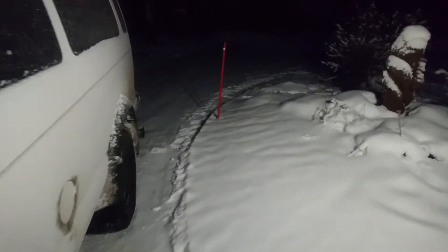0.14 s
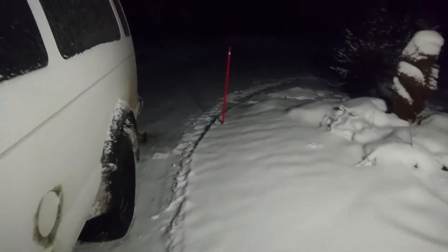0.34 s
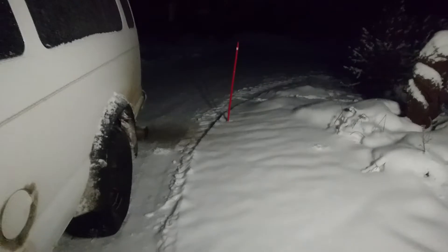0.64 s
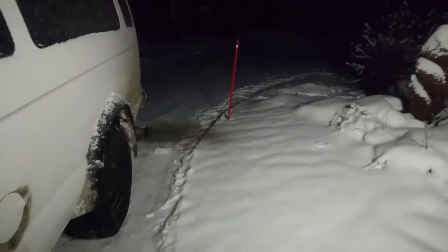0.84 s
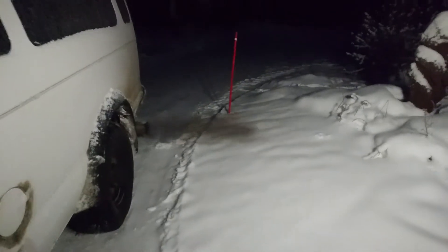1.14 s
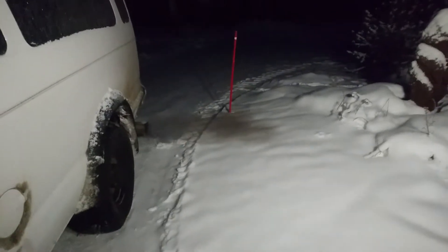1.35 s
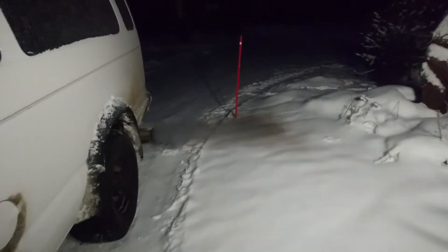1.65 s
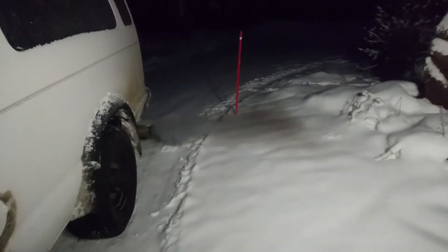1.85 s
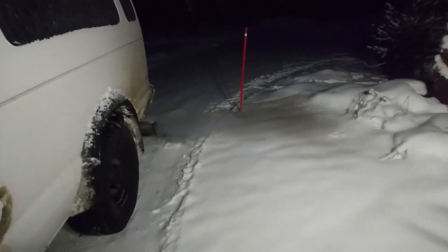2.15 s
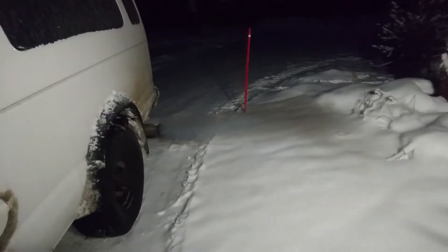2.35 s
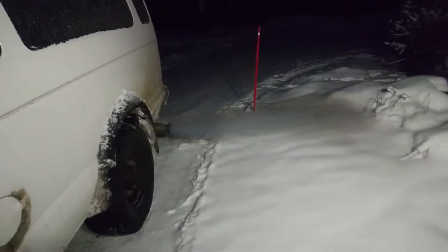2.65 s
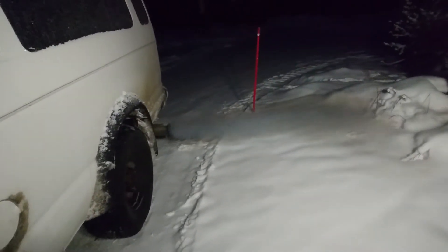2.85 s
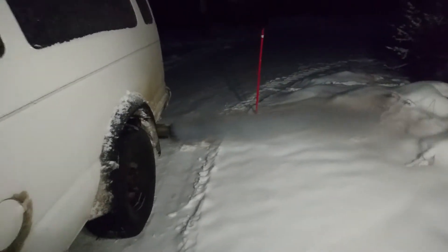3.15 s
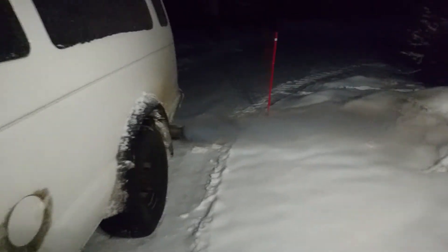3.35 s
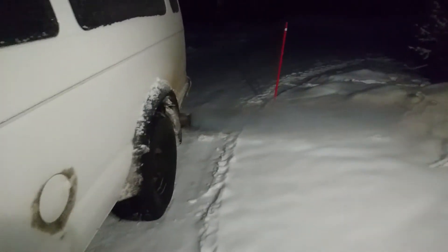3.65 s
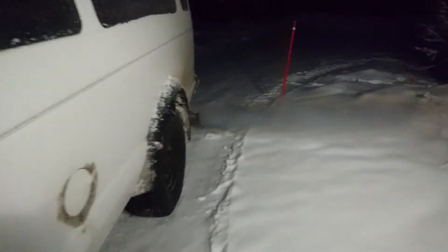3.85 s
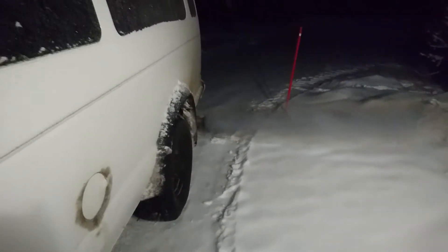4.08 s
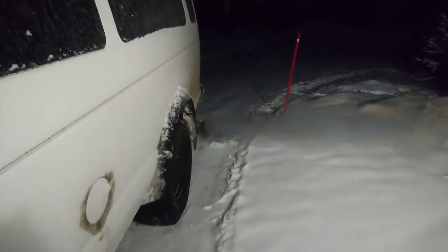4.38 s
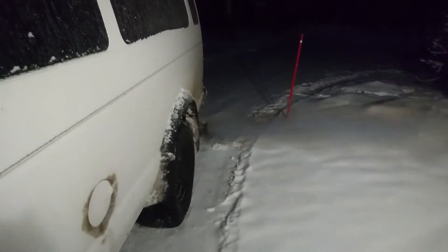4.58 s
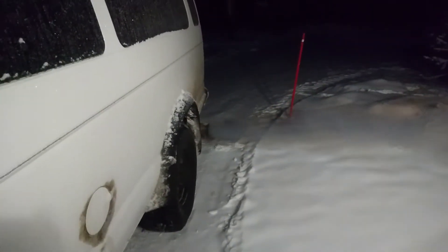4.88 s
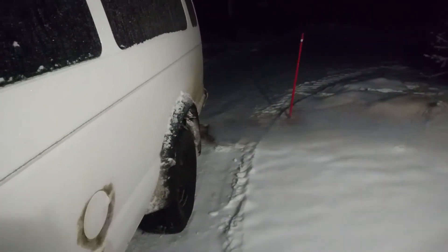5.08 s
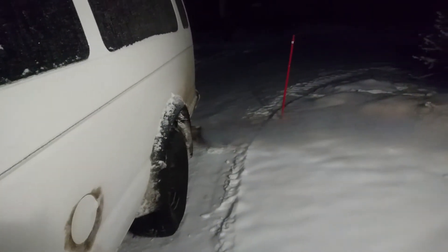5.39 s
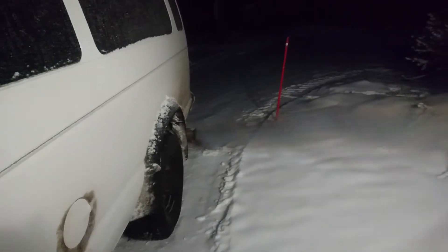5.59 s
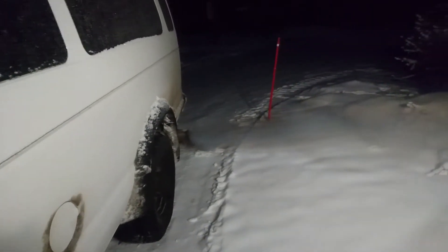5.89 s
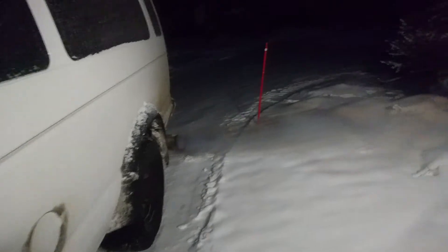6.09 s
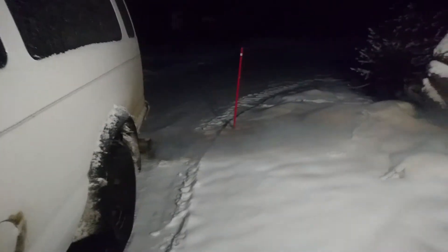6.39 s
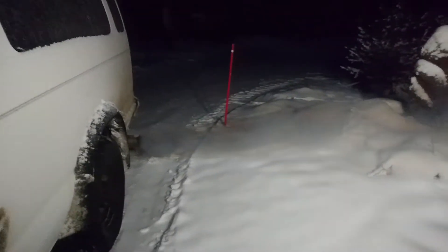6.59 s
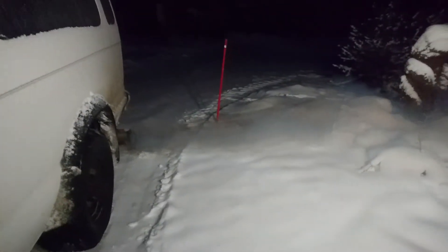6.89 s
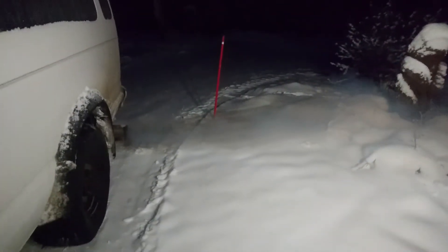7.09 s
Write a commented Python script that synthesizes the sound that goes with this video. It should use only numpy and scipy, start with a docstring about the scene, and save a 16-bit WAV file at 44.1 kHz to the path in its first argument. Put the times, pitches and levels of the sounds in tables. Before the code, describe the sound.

From 0 s a big cold eight-cylinder diesel, already caught, races with a strong burst of deep exhaust, firing about 93 times a second. Gas rushes and barks, intake roar builds briefly, and a wavering belt whine stands out between about 0.2 and 1.8 s. A single dry handling click falls near 0.66 s. The pitch slides down quickly until about 1.2 s, then more slowly; roar and whine sink away by 2.5 s, uncovering knocks and clatter. From 2.5 to 4.3 s the lumpy exhaust weakens in places, with bright metallic ticks and hard knocks at irregular moments. From about 4.7 s it holds a rough idle near 50 firings a second, throbbing, rattling and tapping under a thin flickering hiss, and continues to the end at 7.2 s. Outdoors on snow, close and dry; a stereo phone a few metres away, deepest bass thinned, taps drifting right as it turns.

```python
"""The exhaust of a cold eight-cylinder diesel van leads: just caught, it races, drops to idle and fires unevenly.
Each firing sends a pressure pulse that rings the pipe; gas noise rushes and barks after it. Knocks are noise
bursts that also ring the block; the valve gear ticks and taps. Intake roar and a belt-driven whine sink with
the speed, over a thin flickering hiss; one dry handling click stands apart from the engine.
A phone with two microphone ports hears it from a few metres off, on snow."""
import sys
import numpy as np
from scipy import signal
from scipy.fft import rfft, irfft, next_fast_len
from scipy.io import wavfile
from scipy.ndimage import uniform_filter1d, map_coordinates

SR = 44100
rng = np.random.default_rng(int(sys.argv[2]) if len(sys.argv) > 2 else 0)


def waveform_to_disk(signal):
    """Save audio, clipped to [-1, 1], as 16-bit WAV at the path in sys.argv[1]."""
    frames = np.transpose(np.atleast_2d(signal))
    scaled = np.clip(frames, -1, 1) * 32767
    samples = np.round(scaled).astype(np.int16)
    wavfile.write(sys.argv[1], SR, samples)


N = 318843
M = next_fast_len(N)  # transform length [samples]

# how fast the engine fires: (time [s], firing rate [Hz])
FIRING_RATE = [(0, 93.07), (0.25, 87.9), (0.5, 80.03), (0.75, 75.27), (1, 68.19), (1.25, 62.01),
               (1.5, 61.12), (2, 56.91), (2.3, 55.81), (2.55, 52.73), (3, 54.7), (3.3, 52.89), (4.3, 52.68),
               (4.7, 48.27), (5.1, 50.28), (6.4, 49.52), (6.8, 48.41), (7.23, 50.44)]
START = .62  # firings elapsed at the start
KNOCK_AT = 0.677  # place of the knock between two firings, 0-1
IDLE_HZ = 50  # firing rate at idle [Hz]
SIDES = np.array([[.5], [-.5]])  # shares a left-minus-right difference between the ports


def undb(db):
    """Amplitude factor of a level in dB."""
    return 10 ** (np.asarray(db) / 20)


def unit(x):
    """Scale to an RMS of 1 over all channels together."""
    return x / np.sqrt(np.mean(x ** 2))


def curves(table, s=None):
    """Columns of a time table at times s, by default every sample."""
    t, *columns = np.transpose(table)
    s = np.arange(N) / SR if s is None else s
    return np.array([np.interp(s, t, column) for column in columns])


def gain(points):
    """Gain of (frequency [Hz], level [dB]) points at every frequency bin."""
    hz, db = np.transpose(points)
    bins_hz = np.fft.rfftfreq(M, 1 / SR)
    return undb(np.interp(np.log(bins_hz + 1), np.log(hz), db))


def colour(x, points):
    """Shape the spectrum of x without delay."""
    return irfft(rfft(x, M) * gain(points), M)[..., :N]


def band(x, hz, width_hz):
    """One resonance of the given width."""
    return signal.lfilter(*signal.iirpeak(hz, hz / width_hz, SR), x)


def ring(x, modes):
    """Decaying modes (frequency [Hz], level [dB], 60 dB decay time [s]) struck by x."""
    out = 0
    for hz, db, t60 in modes:
        pole = np.exp(2j * np.pi * hz / SR - np.log(1000) / (t60 * SR))
        out = out + undb(db) * signal.lfilter([1], [1, -pole], x).imag
    return out


def pulses(s, size):
    """Impulses at times s, each shared between two samples."""
    at, out = np.clip(s * SR, 0, N - 2), np.zeros(N)
    i = at.astype(int)
    np.add.at(out, i, size * (1 - at + i))
    np.add.at(out, i + 1, size * (at - i))
    return out


def walk(rate):
    """Random levels held for 1 / rate seconds and slewed twice; spread near 1."""
    k = int(SR / rate)
    held = np.repeat(rng.standard_normal(N // k + 1), k)
    return 1.3 * uniform_filter1d(uniform_filter1d(held, k), k)[:N]


def swell(x, rise_s, fall_s):
    """Each impulse becomes a quick rise and a fall, at an RMS of 1."""
    for s in (rise_s, fall_s):
        x = signal.lfilter([1], [1, -np.exp(-1 / (s * SR))], x)
    return unit(x)


def bump(t, middle_s, half_s):
    """A bell curve in time, 1 at its middle."""
    return np.exp(-((t - middle_s) / half_s) ** 2)


def air():
    """White noise at the two ports: a common part and a scattered part of each port's own."""
    # own paths off the snow and the panels, against the common part: (frequency [Hz], level [dB])
    scatter = [(200, -22.5), (500, -7.5), (1000, -4), (2000, -5.5), (3300, 6), (4200, -3.5), (5500, -0.5),
               (8000, 1.5), (12000, 12)]
    common, left, right = rfft(rng.standard_normal((3, M)))
    own = gain(scatter)
    both = (common + own * np.array([left, right])) / np.sqrt(1 + own ** 2)
    return irfft(both, M)[:, :N]


def thin_hiss():
    """High coloured noise that flickers and follows its own level curve."""
    # spectrum of the hiss: (frequency [Hz], relative level [dB])
    hiss_colour = [(5500, -5), (7000, 12), (8200, -1), (9600, -6), (11100, 1.5), (12500, -5.5),
                   (13500, -33), (15500, -19)]
    # its course: (time [s], level [dB])
    hiss_level = [(0, -78), (.4, -48), (.75, -45.5), (1.7, -59), (2.4, -63), (3.4, -52.5), (4.3, -63),
                  (5.6, -58.5), (6.5, -54.5), (7.23, -55)]
    flicker = undb(1.44 * walk(23.19))
    return unit(colour(air(), hiss_colour)) * flicker * undb(curves(hiss_level)[0])


def handling_click():
    """One dry broadband handling click: a differenced, very short decay at a set time."""
    # the click: (time [s], level [dB])
    dry_click = [(0.6578, -16)]
    s, db = np.transpose(dry_click)
    return np.diff(signal.lfilter([1], [1, -.4], pulses(s, undb(db))), prepend=0)


def belt_whine(firings):
    """Two sines locked to the firing rate, wavering in level and phase."""
    # level of the two tones: (time [s], lower tone level [dB], upper tone level [dB])
    whine_level = [(0, -58, -54), (.17, -44, -54), (.27, -30.5, -34.5), (.45, -37, -50), (.6, -27, -33.5),
                   (.85, -31.5, -42), (.97, -43, -54), (1.2, -50, -41), (1.35, -36.5, -40),
                   (1.75, -37, -48), (2, -45, -45), (2.6, -72, -62)]
    # pitch of each tone: one entry per tone [cycles per firing]
    orders = [7, 10.5]
    out = 0
    for order, db in zip(orders, curves(whine_level)):
        phase = 2 * np.pi * order * firings + .7 * walk(40)
        out = out + undb(db + 3.5 * walk(20)) * np.sin(phase)
    return out


def valve_gear(when):
    """Metallic ticks and duller taps ring at fixed places of every round, with loud ticks at set times."""
    # one round of eight firings: (place [firings], tick [dB], upper tick [dB], low tap [dB], high tap [dB])
    gear = [(1.65, -50, -60, -45, -31), (2.7, -60, -60, -36, -31), (3.65, -41, -56, -45, -36),
            (4.68, -60, -60, -24, -36), (6.6, -41, -50, -38, -23)]
    # spread from round to round: one entry for each of the four sounds [dB]
    gear_scatter = [2, 3, 1.5, 1.5]
    # the loudest ticks: (time [s], level [dB], upper mode level against it [dB])
    loud_ticks = [(1.6734, -37, -16), (1.997, -31, -17), (2.0858, -33.0, -20), (2.2278, -38, -16.0),
                  (2.5254, -32.0, -17.0), (2.5768, -37, -18), (2.6736, -30.0, -14.0), (2.8241, -30, -4),
                  (2.9675, -32, -10), (3.116, -25.5, -17.0), (3.1691, -31, -17), (3.27, -24.5, -18.0),
                  (3.4698, -31, -1), (3.5646, -30, -5), (3.6251, -31, -2), (3.7186, -30, -11.0),
                  (3.7725, -27.0, -3), (3.8664, -31, -16.0), (3.9262, -32, -10), (4.1756, -29.0, -16.0),
                  (4.3291, -45, -14.0), (4.3808, -40, -12.0), (4.539, -31.0, -4), (4.6463, -32.0, -14.0),
                  (5.1845, -31, -1), (5.4466, -38, -15.0), (5.6651, -35, -1), (5.7695, -41, -12.0),
                  (5.9265, -32, -18.0), (5.985, -32, -17.0), (6.0876, -41, -14.0), (6.2517, -33, -16.0),
                  (6.3097, -31, -17.0), (6.4111, -34.0, -15), (6.8003, -38, -20), (7.0648, -37, -13.0)]
    # ringing of the ticks, lower and upper: (frequency [Hz], level [dB], 60 dB decay time [s])
    low_modes = [(5030, 1, .03), (4880, -2, .02), (5220, -5, .015)]
    high_modes = [(6770, 0, .015), (7250, -5, .012)]
    # low tap, then high tap: lists of (frequency [Hz], level [dB], 60 dB decay time [s])
    tap_modes = [
        [(1995, -3, 0.033), (2080, -2, 0.032)],
        [(2340, -4, 0.034), (2660, -12.5, 0.026)],
    ]
    # the taps drift right as the phone turns: (time [s], left minus right [dB])
    tap_pan = [(2.5, 0), (4.5, -2.5), (6.2, -6)]
    jitter_s = .0005
    fade_db_per_hz, fade_above_hz = -1.2, 56  # ticks and taps fade at faster firing
    tick_left_db = 4  # the ticks sit this much further left than the taps

    place, *levels = np.transpose(gear)
    at = (8 * np.arange(len(when) // 8)[:, None] + place).ravel()
    chance = rng.standard_normal((len(at), 5)).T
    s = np.interp(at, np.arange(len(when)), when) + jitter_s * chance[0]
    fade_db = fade_db_per_hz * np.maximum(curves(FIRING_RATE, s)[0] - fade_above_hz, 0)
    low, high, *taps = (pulses(s, undb(np.resize(db, len(s)) + fade_db + spread_db * own))
                        for db, spread_db, own in zip(levels, gear_scatter, chance[1:]))

    loud_s, loud_db, upper_db = np.transpose(loud_ticks)
    low = low + pulses(loud_s, undb(loud_db))
    high = high + pulses(loud_s, undb(loud_db + upper_db))
    pings = ring(low, low_modes) + ring(high, high_modes)
    pings = sum(band(pings, hz, 1300) for hz in (5000, 6950))
    taps = sum(band(ring(x, modes), modes[0][0], 800) for x, modes in zip(taps, tap_modes))
    pan = curves(tap_pan)
    return pings * undb((pan + tick_left_db) * SIDES) + taps * undb(pan * SIDES)


def gas_noise(when):
    """Turbulent noise of the gas, steady underneath and barking after each firing."""
    # bark after each of cylinders 1-8: one entry per cylinder [dB]
    bark = [-8, -6, -10, 6, -2, -10, 5, 0]
    n = np.arange(len(when))
    barks = pulses(np.interp(n + KNOCK_AT, n, when), undb(np.array(bark)[n % 8]))
    gate = 1.3 + swell(barks, 0.007, 0.007)
    return gate * undb(.7 * walk(9)) * air()


def intake_roar(gas, flow):
    """The gated gas noise in the intake's colour, sinking as the flow falls."""
    # spectrum of the roar: (frequency [Hz], relative level [dB])
    roar_colour = [(180, -38), (290, 11), (450, -61), (720, -25), (850, -10), (1000, -25), (1150, -37),
                   (1420, 4), (1650, 5.5), (1950, -9), (2400, -1.5), (2670, -5), (2900, -25), (3100, -2),
                   (3400, -11), (4200, -15), (5200, -25), (5800, -15), (7000, -50)]
    return unit(colour(gas, roar_colour)) * undb(-47 + 0.79 * flow)  # idle dB, dB per Hz of flow


def gas_rush(gas, flow):
    """Gas noise that grows with flow, plus two bands that swell and sink on their own."""
    # spectrum of the rush: (frequency [Hz], relative level [dB])
    rush_colour = [(60, -54), (140, 4), (165, -4.5), (190, -8), (220, 2), (245, -12.5), (290, -14.5),
                   (310, -18.5), (340, -11), (410, -5.5), (530, -10.5), (620, -6.5), (800, -17.5),
                   (1100, -14), (1550, -25.5), (1900, -16.5), (4000, -88)]
    # the two bands: (frequency [Hz], relative level [dB])
    low_band = [(190, -1), (240, 24), (290, 8), (340, 6), (420, -43.5)]
    middle_band = [(330, -9), (430, -4.5), (600, 0.5), (760, 11), (900, 6.5), (1100, -35)]
    # their course: (time [s], low band level [dB], middle band level [dB])
    bands_level = [(0, -34, -46), (.8, -48, -52), (1.3, -37, -54), (1.9, -43, -69), (2.8, -52, -63),
                   (3.8, -74, -52), (4.7, -58, -50), (5.8, -73, -38.5), (6.5, -45.5, -48), (7.23, -57, -51)]
    rush = unit(colour(gas, rush_colour)) * undb(-34 + 0.245 * flow)  # idle dB, dB per Hz of flow
    for points, db in zip((low_band, middle_band), curves(bands_level)):
        rush = rush + unit(colour(gas, points)) * undb(db)
    return rush


def knock_times(when):
    """Combustion strikes the block a little unevenly between firings."""
    n = np.arange(len(when))
    return np.interp(n + KNOCK_AT, n, when) + .0008 * rng.standard_normal(len(n))


def block_ring(strikes):
    """Each blow, a short push and a noisy grit, sets the modes of the block ringing."""
    # modes of the block: (frequency [Hz], 60 dB decay time [s], blow from cylinders 1-8 [8 x dB])
    modes = [(1069.5, 0.051, -20, -24, 8, 1, 9, -19, -12, 0),
             (1202.5, 0.077, -1.5, -17, 8.5, 0.5, 1, 1, 7.5, -0.5),
             (1292, 0.049, -30, -16, 5, -18, -2.5, 3, 9, 6), (1630, 0.015, 3, -3, -16, 13, 3, -14, 12, 4),
             (1733, 0.022, 11, 1, -14, 15.5, 4, 7, -2, -4),
             (2186, 0.066, -17, -26, -12, -2, -16, -3, 4, -17),
             (2710, 0.013, -24, -14, -1, 11, -8, -8, -13, -24)]
    # course of the ring: (time [s], level [dB])
    ring_level = [(0, -70), (.8, -40), (1.5, -36.5), (2.2, -36.5), (3, -33), (3.8, -36), (5, -36),
                  (6, -34.5), (7.23, -36.5)]
    contact_s = 0.0001
    n = np.arange(len(strikes))
    scatter_db = rng.standard_normal(len(n))
    grit = undb(5) * air()  # 5 dB over the push, before its own envelope
    block = 0
    for hz, t60, *db in modes:
        blows = pulses(strikes, undb(np.array(db)[n % 8] + scatter_db))
        size = np.sqrt(np.mean(blows ** 2))
        push = swell(blows, contact_s, contact_s) + swell(blows, 0.004, 0.0055) * grit
        block = block + size * band(ring(push, [(hz, 0, t60)]), hz, 270)
    return unit(block) * undb(curves(ring_level)[0])


def clatter(strikes, flow):
    """Knocks shake covers, pipes and brackets: noise bursts in several bands over a steady rattle."""
    # spectrum of the clatter: (frequency [Hz], relative level [dB])
    clatter_colour = [(400, -47), (700, -27), (950, -9), (1200, -4), (1500, -8.5), (1980, -6),
                      (2350, -10.5), (2750, -9), (3450, -14), (4200, -15), (5000, -18.5), (5600, -20.5),
                      (7000, -26.5), (7700, -31), (8400, -37.5), (10300, -42.5), (13500, -45), (16000, -96)]
    # how hard each cylinder shakes each group of parts: (frequency [Hz], cylinders 1-8 [8 x dB])
    parts = [(700, -12, 1, 2.7, 11, 14, 3, 7.4, 1), (1180, -9, 1.4, 10.7, 1.3, -36, 13, 10, 3),
             (1580, 14.5, 6.7, 2.3, 10, 0, 16, 9.8, 2), (2020, -13, 1, 4.5, 12, 11.5, 9, 9, 10.5),
             (2660, -2, 13, 6.7, 4.3, 13.5, 3, 13.7, 7), (3370, 16.5, 14, 14.6, 8.6, 8, 8.5, 3.7, -5),
             (5160, -2, 2.8, 1.5, 7.7, -3, 5.5, 9.7, -8.5),
             (7050, 13.5, 10, 0.89, 7.3, 11, 12.5, 14.5, -15)]
    # the hardest knocks, at set times: (time [s], relative level [dB])
    hard_knocks = [(2.1394, -24.5), (2.5784, -19.5), (2.6552, -18), (3.0184, -23), (3.171, -15.5),
                   (3.3242, -18), (3.4714, -20.5), (3.5487, -25.5), (3.6205, -17.5), (3.6983, -28.5),
                   (3.7732, -21), (4.1753, -28), (4.3084, -23), (4.5394, -34.5), (5.0273, -22),
                   (5.0882, -27), (5.186, -22), (5.2688, -20), (5.588, -21), (5.8255, -35.5), (5.91, -23),
                   (5.9851, -33.5), (6.2331, -23.5), (6.272, -23), (6.3099, -38), (6.4311, -33),
                   (6.7205, -21), (6.7614, -32), (6.9245, -19), (7.2069, -25.5)]
    n = np.arange(len(strikes))
    hz, *knock_db = np.transpose(parts)
    shared_chance, *part_chances = rng.standard_normal((len(n), 1 + len(hz))).T
    rattle = 1.4 * undb(0.5 * walk(19))
    noise = colour(air(), clatter_colour)
    spectrum, octaves = rfft(noise, M), np.log2(np.fft.rfftfreq(M, 1 / SR) + 1)
    out = 0
    for k, own in enumerate(part_chances):
        share = np.interp(octaves, np.log2(hz), np.eye(len(hz))[k])  # neighbours cross-fade
        db = np.array(knock_db)[n % 8, k] + shared_chance + 1.3 * own
        bursts = swell(pulses(strikes, undb(db)), .003, .006)
        out = out + irfft(spectrum * share, M)[:, :N] * (rattle + bursts)
    hard_s, hard_db = np.transpose(hard_knocks)
    hard = swell(pulses(hard_s, undb(hard_db)), .001, 0.0087)
    out = unit(out) + undb(-24) * unit(noise) * hard
    return unit(out) * undb(-32.5 + 0.0154 * flow)  # idle dB, dB per Hz of flow


def exhaust(when):
    """A pressure pulse per firing travels through its runner and rings the pipe resonances."""
    # pulse strength: (time [s], cylinders 1-8 [8 x dB])
    cylinders = [(.1, -6, -3.5, 0.5, -18, 0.81, -15, 8, -13), (.5, 0, -2, 5, -1.5, 0.89, -4, 7, 5.5),
                 (1.1, -1.5, 10, -0.5, 3.5, 0.94, 9, 10, 7.5), (3.5, 5, -1, 2.5, -4.5, 0.17, 6, 0, 6),
                 (5, 5.5, 7, -2, 2.5, 1, 1, 9, -1.5)]
    # travel time through each manifold runner: one entry per cylinder [ms]
    runner_ms = [6.1, 4.2, 4.17, 4.95, 4.54, 5.35, 4.57, 3.73]
    # pipe resonances: (frequency [Hz], width [Hz], level [dB], signed factor at the open end)
    pipe = [(56.8, 6.5, 5, 0.4), (65.2, 7.75, 14, 0.89), (99.3, 14.2, 8, 0.51), (108.5, 5.9, -1.5, 0.89),
            (133.2, 19.8, 3.5, -1.15), (149.1, 1.6, -1, -0.24), (181, 5.5, -11.5, 0.88),
            (203.3, 17, -7.5, -0.95), (221.3, 11.6, -7.5, 1), (293, 16, -17, 0.55)]
    # a pressure pulse is soft-edged: (frequency [Hz], level [dB])
    puff = [(40, 18.3), (330, 0), (450, -14), (1000, -56), (3000, -100)]
    # spells of weak firing: (middle [s], half length [s], level change [dB])
    misfires = [(2.7, .3, -5), (4.15, .3, -9)]
    # the cold cylinders that misfire: one entry each [counted from 0]
    cold = [1, 2]
    # course of the exhaust: (time [s], level [dB])
    load = [(0, -7), (.04, -20.5), (.09, -11.5), (.2, -16.5), (.6, -15.5), (1, -13.5), (1.3, -16.5),
            (1.7, -15), (2.6, -20.5), (2.9, -19.5), (3.03, -17), (3.12, -20), (4.7, -21), (6.3, -19.5),
            (6.8, -21), (7.23, -19)]
    pipe_delay_s, jitter_s = 0.0039, .0003  # way along the pipe to the open end; unevenness

    n = np.arange(len(when))
    chance = rng.standard_normal((2, len(n)))
    # swells once in every round of eight, strongest at place 2.98
    throb_db = 2.5 * np.cos(2 * np.pi * (n - 2.98) / len(runner_ms))
    db = curves(cylinders, when)[n % 8, n] + chance[0] + throb_db
    db = db + np.isin(n % 8, cold) * sum(d * bump(when, s, half) for s, half, d in misfires)
    arrival = when + np.array(runner_ms)[n % 8] / 1000 + pipe_delay_s + jitter_s * chance[1]
    puffs = pulses(arrival, undb(db))
    lead = np.tile(puffs[:int((when[8] - when[0]) * SR)], 4)  # the pipe is already ringing
    driven = np.r_[lead, puffs]
    tone = sum(sign * undb(level) * band(driven, hz, width) for hz, width, level, sign in pipe)
    tone = np.gradient(colour(tone[len(lead):], puff))  # the open end radiates the change of flow
    # even out the slow level, so that it follows the load wherever the resonances lie
    power = uniform_filter1d(uniform_filter1d(tone ** 2, SR // 4), SR // 4)
    return unit(tone / np.sqrt(power)) * undb(curves(load)[0])


def microphone_ports(sound):
    """Two ports on the phone's body differ in colour, phase and arrival time."""
    # a narrow dip, likely an echo off the snow, deep early and nearly gone by the end: (time [s], depth [0-1])
    dip = [(0, 0.25), (1.5, 0.7), (2.6, 0.7), (4.5, 0.07), (7.23, 0.06)]
    # colour between the ports: (frequency [Hz], left minus right [dB])
    port_level = [(60, -2), (100, 1), (180, 1), (300, -1), (510, 1), (870, 1.5), (1490, -2.5), (2550, -3),
                  (4370, -3.5), (7460, -4.5)]
    # around the phone's body the left port leads by less: (frequency [Hz], phase [radians])
    port_phase = [(200, 0), (500, -.3), (1050, -.55), (1300, -.4), (1600, -.15), (2000, 0), (3200, -.4),
                  (4200, 0)]
    # the sound reaches the left port first, shifting as the phone turns: (time [s], lag [ms])
    port_lag = [(0, .262), (1.2, .28), (2.5, .292), (3.7, .29), (4.2, .272), (4.6, .258), (5.2, .253),
                (6.3, .24), (7.23, .25)]
    sound = sound - np.clip(curves(dip)[0], 0, 1) * band(sound, 1990, 220)  # centre and width in Hz
    hz, radians = np.transpose(port_phase)
    phase = np.interp(np.fft.rfftfreq(M, 1 / SR), hz, radians)
    difference = gain(port_level) * np.exp(1j * phase)
    left, right = irfft(rfft(sound, M) * difference ** SIDES, M)[:, :N]
    half_lag = curves(port_lag)[0] / 2000 * SR  # samples
    return np.array([map_coordinates(x, [np.arange(N) + k * half_lag], order=3, mode="mirror")
                     for x, k in ((left, 1), (right, -1))])


def scene():
    """One count of firings times the engine's regular pulses; hiss and handling click are independent of it."""
    t, speed = np.arange(N) / SR, curves(FIRING_RATE)[0]
    firings = START + np.cumsum(speed) / SR
    when = np.interp(np.arange(int(firings[-1]) + 1), firings, t)
    when[0] = -START / speed[0]  # this firing fell before the start
    # flow builds over 0.73 s; the engine caught 0.21 s before the start
    flow = np.maximum(speed - IDLE_HZ, 0) * (1 - np.exp(-(t + 0.21) / 0.73))
    gas, strikes = gas_noise(when), knock_times(when)
    sound = thin_hiss() + handling_click() + belt_whine(firings) + valve_gear(when)
    sound = sound + intake_roar(gas, flow) + gas_rush(gas, flow)
    sound = sound + block_ring(strikes) + clatter(strikes, flow) + exhaust(when)
    return microphone_ports(sound)


def record(dry):
    """The phone drops the deepest bass below 44 Hz and cuts the top above 15.7 kHz."""
    x = signal.sosfilt(signal.butter(4, 44, "high", fs=SR, output="sos"), dry)
    return signal.sosfilt(signal.ellip(12, .2, 70, 15700, fs=SR, output="sos"), x)


dry = scene()
out = record(dry)
waveform_to_disk(out)
```